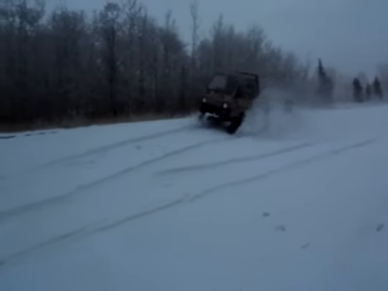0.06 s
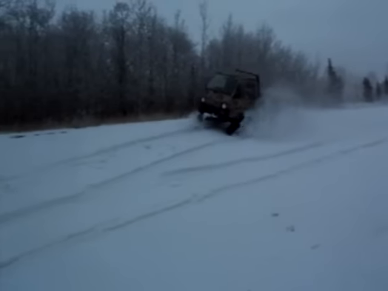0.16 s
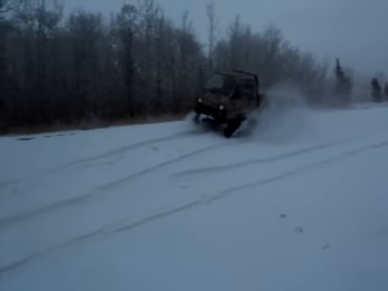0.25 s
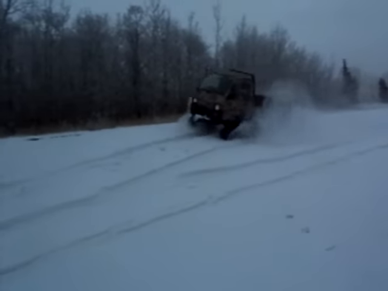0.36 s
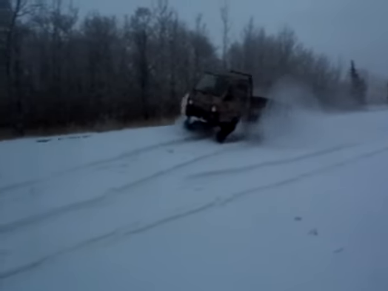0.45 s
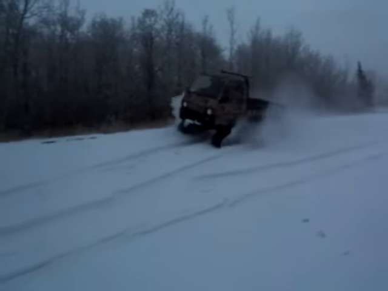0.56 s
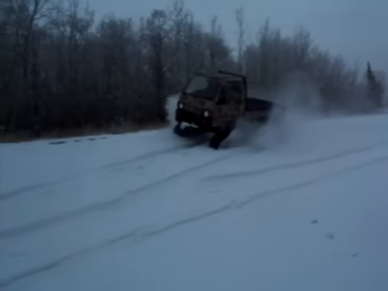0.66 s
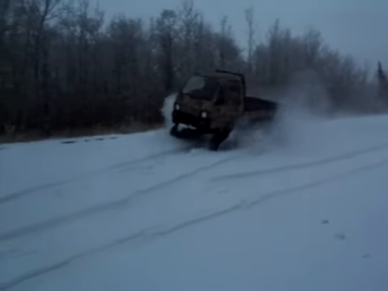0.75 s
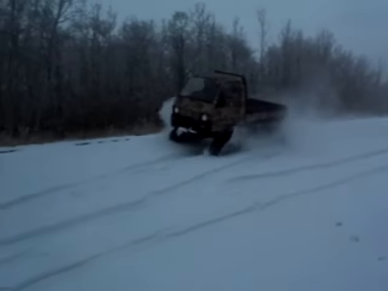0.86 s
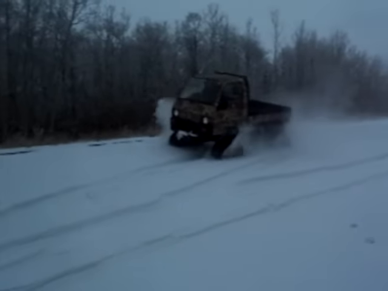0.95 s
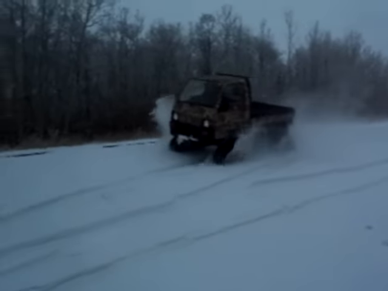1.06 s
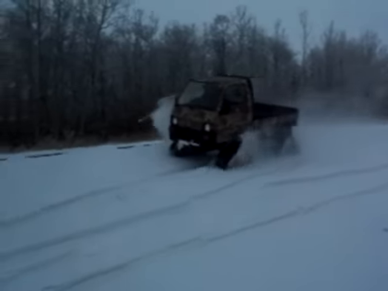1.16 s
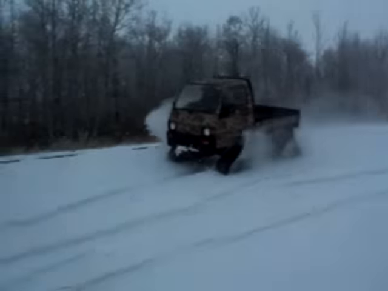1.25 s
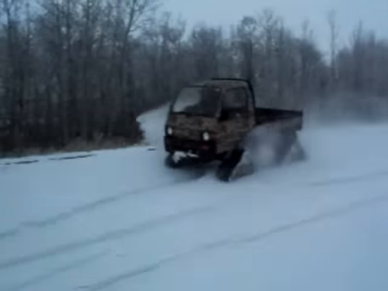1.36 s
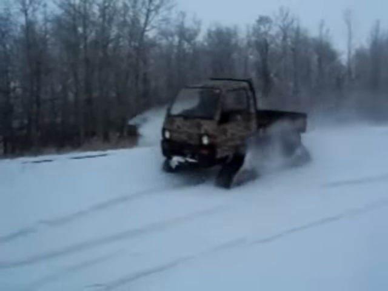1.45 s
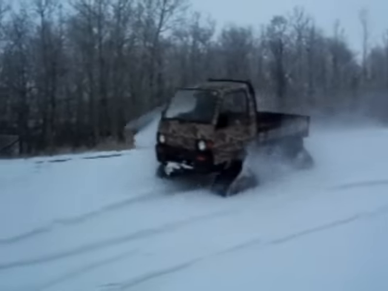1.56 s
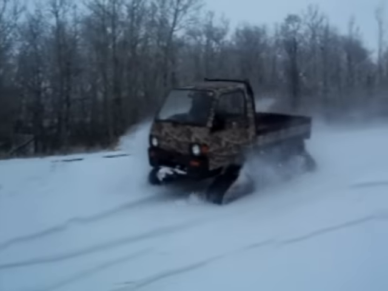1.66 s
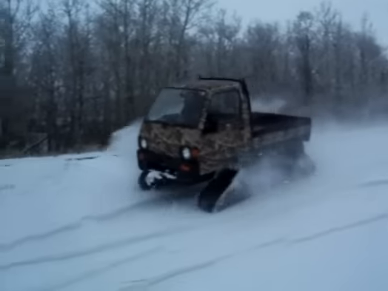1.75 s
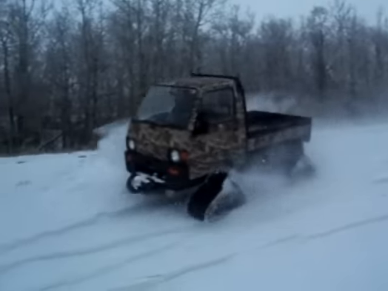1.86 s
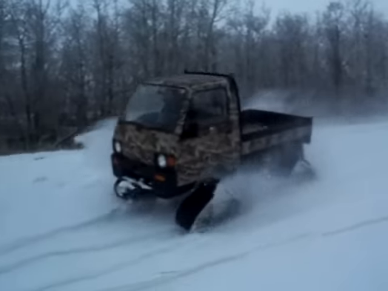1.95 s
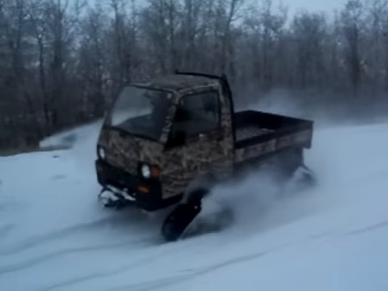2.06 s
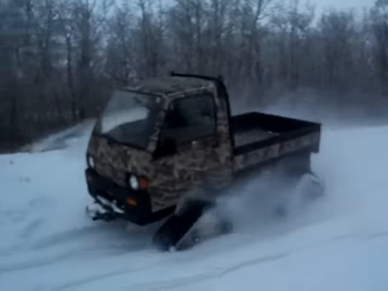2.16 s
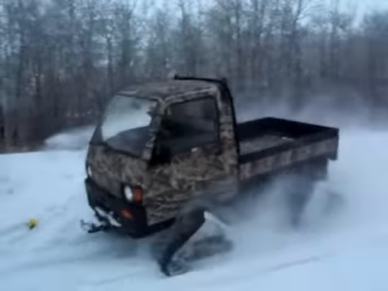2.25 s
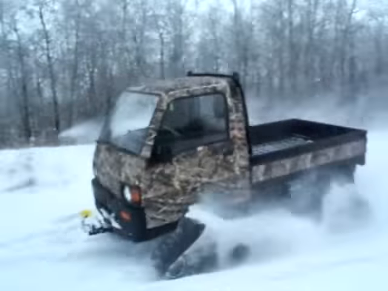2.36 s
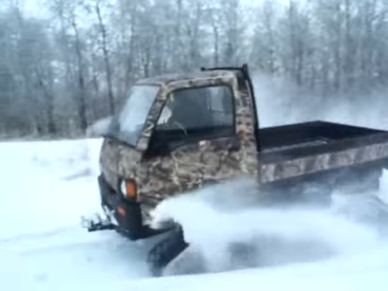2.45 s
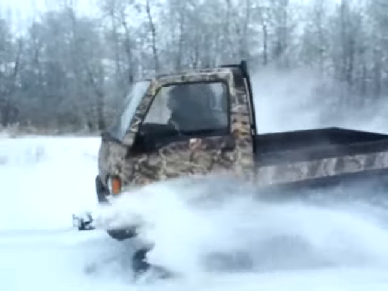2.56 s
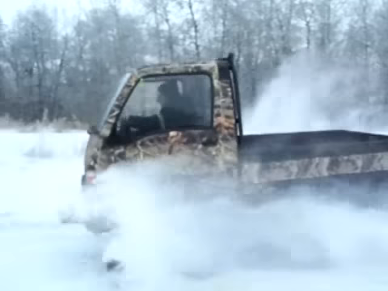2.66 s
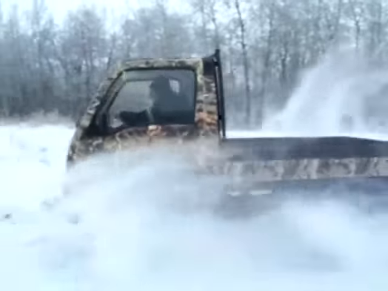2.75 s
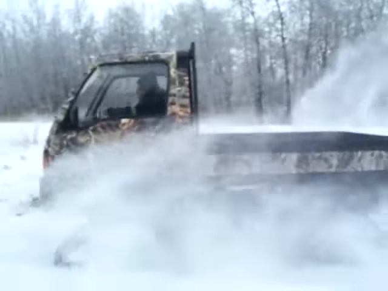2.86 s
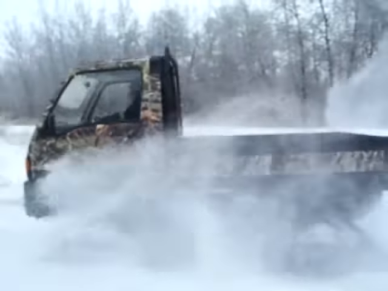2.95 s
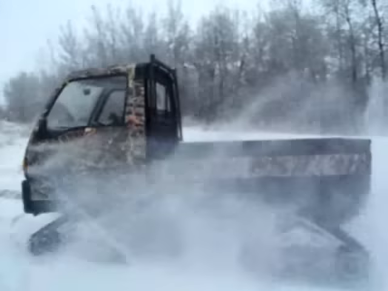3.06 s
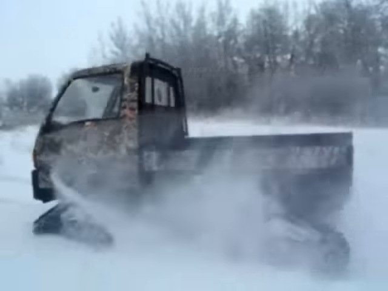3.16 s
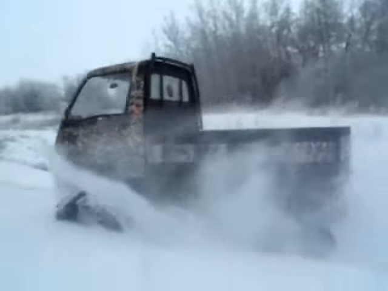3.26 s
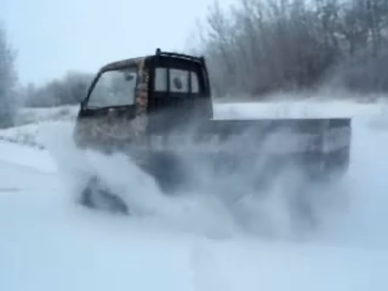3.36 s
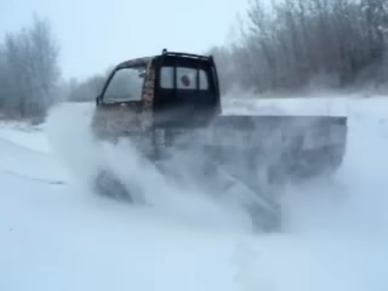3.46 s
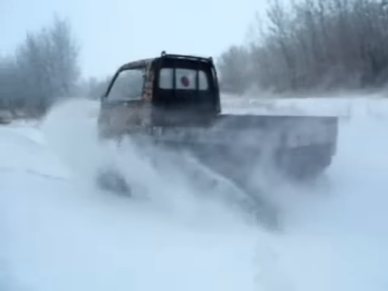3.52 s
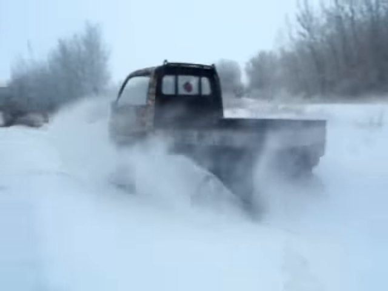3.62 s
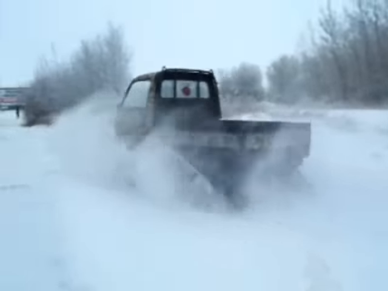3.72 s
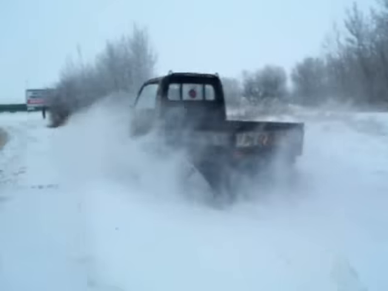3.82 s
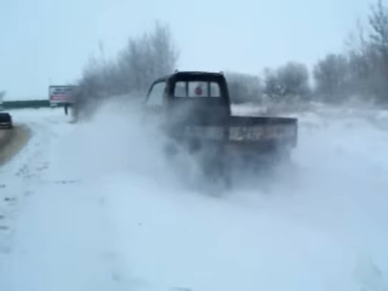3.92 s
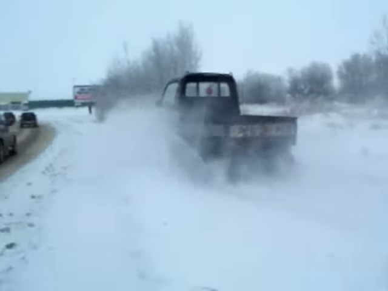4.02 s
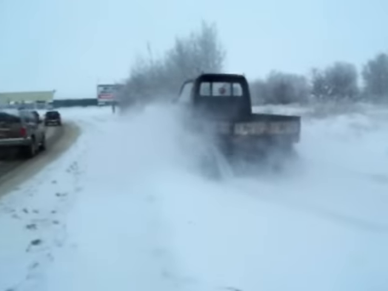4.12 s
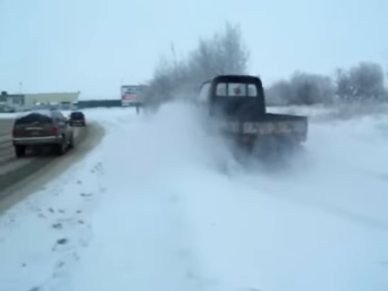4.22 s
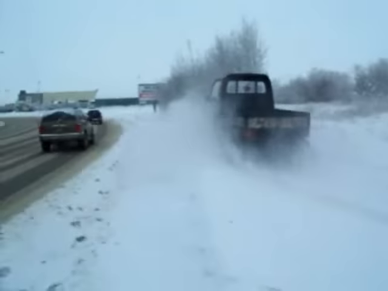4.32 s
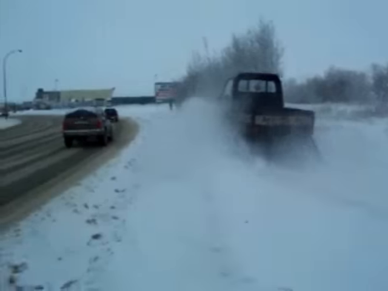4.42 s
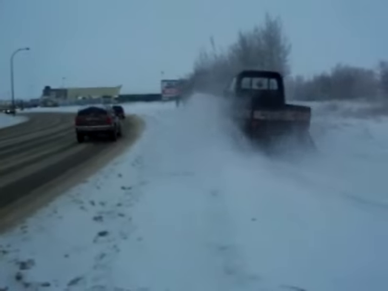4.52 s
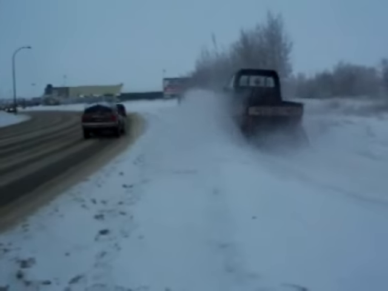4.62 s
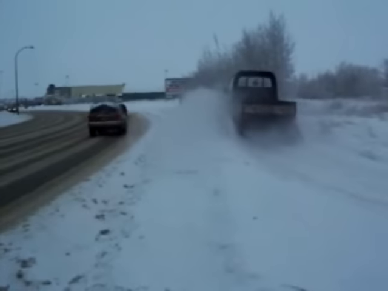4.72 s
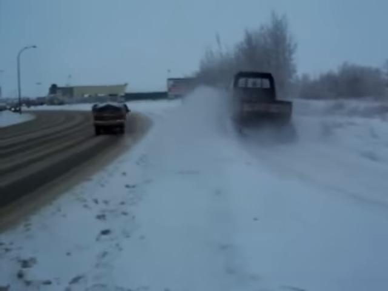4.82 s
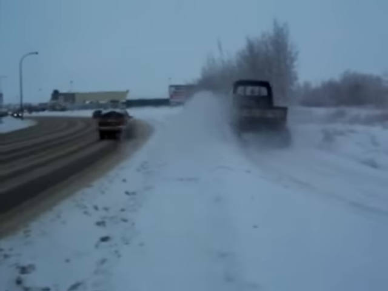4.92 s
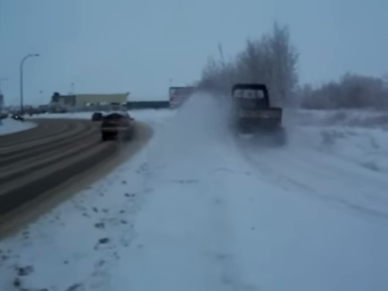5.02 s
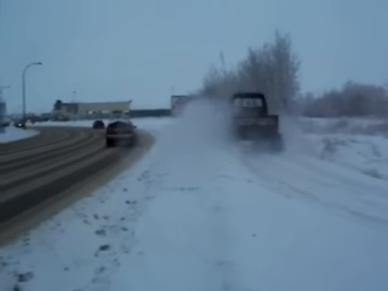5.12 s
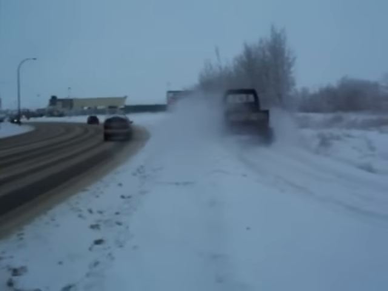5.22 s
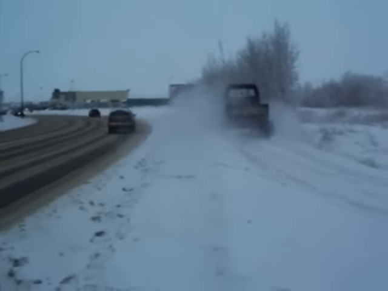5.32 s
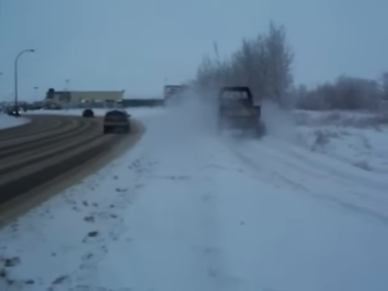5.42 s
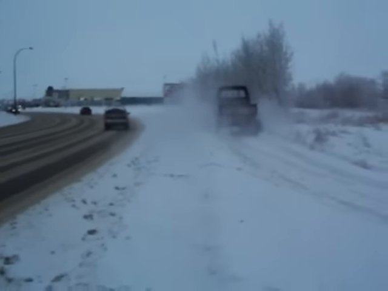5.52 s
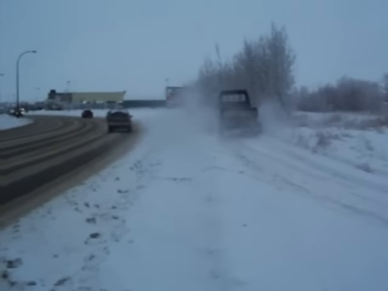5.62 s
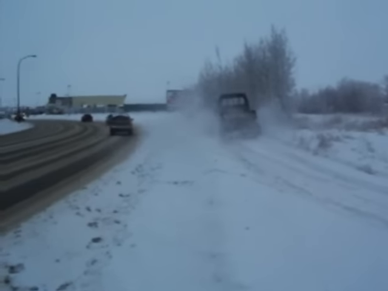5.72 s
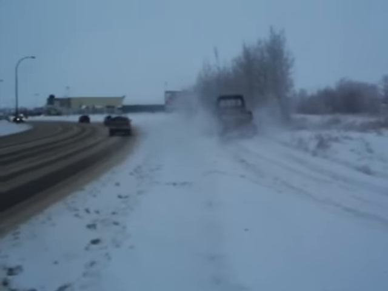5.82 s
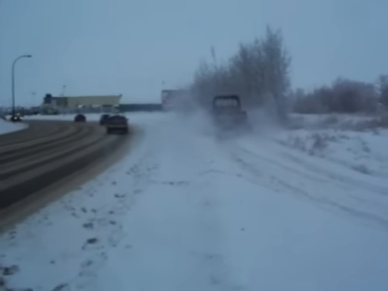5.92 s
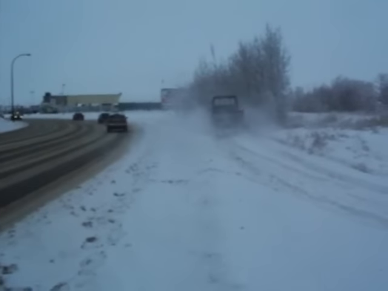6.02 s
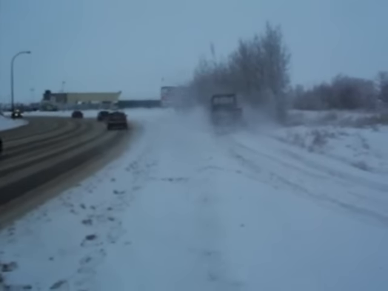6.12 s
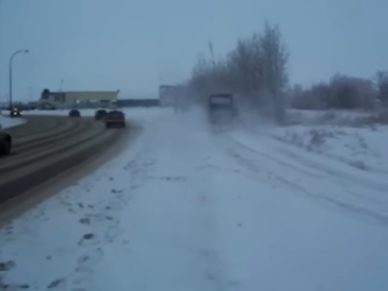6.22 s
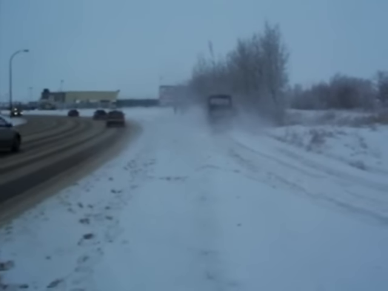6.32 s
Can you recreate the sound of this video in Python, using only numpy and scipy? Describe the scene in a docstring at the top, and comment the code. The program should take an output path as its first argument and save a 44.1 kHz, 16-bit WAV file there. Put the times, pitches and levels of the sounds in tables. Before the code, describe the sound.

A small engine buzzes hard as a tracked mini truck rushes past over deep snow, chassis knocking, snow hissing, then recedes with dry rapid ticking.

```python
"""A three-cylinder engine near 5000 rpm buzzes and clatters nearer over deep snow, the chassis knocking beneath it.
It drives a mini truck on four rubber tracks past a mono camera microphone, 2.9 m off at the closest.
Engine orders and noise bursts follow its cycles; lug passages drive the track drone, slaps and thrown snow.
A track ticks on the way out, by dry snaps with ringing modes. Low wind and the hum of the road lie underneath."""
import sys
import numpy as np
from scipy import signal
from scipy.fft import rfft, irfft, next_fast_len
from scipy.io import wavfile
from scipy.ndimage import uniform_filter1d

SR = 44100
rng = np.random.default_rng(int(sys.argv[2]) if len(sys.argv) > 2 else 0)


def store_wav(level_fs):
    """Save 16-bit WAV to argv[1]."""
    pcm = np.round(np.clip(np.atleast_2d(level_fs), -1, 1) * 32767)
    wavfile.write(sys.argv[1], SR, pcm.T.astype(np.int16))


N = 281358
T = np.arange(N) / SR

# lugs passing a sprocket: t/s, rate/Hz
LUG_RATE = [(0, 33), (.55, 31.8), (.9, 32.8), (1.2, 34), (1.48, 34.3), (1.8, 36), (2.1, 37.3), (2.35, 35.8),
            (2.62, 37.2), (2.88, 36.2), (3.1, 37.3), (3.35, 37.3), (3.6, 38.4), (4, 37.4), (4.3, 35.8),
            (4.5, 35.9), (5.2, 34.3), (5.7, 35), (6.4, 36.2)]
# engine colour heard from the front: f/Hz, relative level/dB
FRONT_COLOUR = [(150, -22.5), (270, -8), (390, 2), (450, 2), (510, 4.5), (580, -1), (645, 4.5), (780, -2.5),
                (1180, -3.5), (1290, 0), (1380, -5), (1750, -10), (2100, -33), (3500, -24)]
# engine colour heard from behind: f/Hz, relative level/dB
REAR_COLOUR = [(150, -1.5), (270, -1.5), (370, 1), (430, -1.5), (510, 1.5), (570, 2.5), (700, 4.5),
               (820, 3.5), (1100, 2), (1250, 2), (1500, 1), (1800, -2), (2100, -10), (2800, -13),
               (3600, -30.5)]
# colour of loose fittings that rattle after a blow: f/Hz, relative level/dB
FITTINGS_COLOUR = [(380, 4.5), (600, 4), (1200, 12.5), (1700, -18), (2100, -28)]


def undb(db):
    """Decibels to gain."""
    return 10 ** (np.asarray(db) / 20)


def unit(x):
    """Scale to rms 1."""
    return x / np.sqrt(np.mean(x ** 2))


def steady(x):
    """Hold the slow level at rms 1 and keep the fast flutter."""
    return x / np.sqrt(uniform_filter1d(x ** 2, SR // 7))


def curves(table):
    """Each column of a table, joined by straight lines in time."""
    s, *columns = np.transpose(table)
    return [np.interp(T, s, column) for column in columns]


def walk(rate):
    """Smooth chance that changes about rate times a second, at most 150; spread near 1."""
    knots = rng.standard_normal(1024)
    steps = T * min(rate, 150)
    k = steps.astype(int)
    part = steps - k
    ease = part * part * (3 - 2 * part)
    return knots[k] + (knots[k + 1] - knots[k]) * ease


def swell(at, lasting):
    """Bell-shaped rise of a part that faces the microphone for a while as the truck goes by."""
    return np.exp(-.5 * ((T - at) / lasting) ** 2)


def swells_db(table):
    """Sum of smooth rises and dips, in dB."""
    return sum(db * swell(at, lasting) for at, lasting, db in table)


def swells_gain(table):
    """Sum of swells as a gain, each peaking at its level in dB."""
    return sum(undb(db) * swell(at, lasting) for at, lasting, db in table)


def gain_at(hz, points):
    """Gain of a (Hz, dB) colour, falling steeply beyond its ends."""
    f, db = np.transpose(points)
    hz = np.maximum(hz, 1)
    ends = np.minimum(1, np.minimum(hz / f[0], f[-1] / hz)) ** 2
    return undb(np.interp(np.log(hz), np.log(f), db)) * ends


def colour(x, points):
    """Filter by a (Hz, dB) colour."""
    size = next_fast_len(len(x) + SR // 10)
    hz = np.arange(size // 2 + 1) * SR / size
    return irfft(rfft(x, size) * gain_at(hz, points), size)[:len(x)]


def tones(table, turns, flutter_db, shake):
    """Fluttering tones locked to a shaft, each heard for a part of the passage."""
    out = 0
    for k, at, lasting, db in table:
        tone = np.sin(2 * np.pi * k * turns + shake * walk(45)) * undb(flutter_db * walk(40))
        out = out + steady(tone) * undb(db) * swell(at, lasting)
    return out


def place(sound, at):
    """Set a short sound at its moment."""
    return np.pad(sound, (max(int(at * SR), 0), N))[:N]


def level_short(burst):
    """Give a short sound the energy of 4 ms at rms 1."""
    return burst * np.sqrt(.004 * SR / np.sum(burst ** 2))


def crack(decay, points):
    """A dry, coloured burst of noise that dies away with the given decay in seconds."""
    age = T[:SR // 20]
    return level_short(colour(rng.standard_normal(len(age)) * np.exp(-age / decay), points))


def ringing(modes, detune=1):
    """Modes (Hz, dB, decay s) dying away after a blow."""
    age = T[:SR // 20]
    return sum(undb(db) * np.exp(-age / decay) * np.sin(2 * np.pi * hz * detune * age)
               for hz, db, decay in modes)


def thud(bright_db, detune=1):
    """The chassis rings after one blow; bright_db tilts its modes per octave about 800 Hz."""
    # chassis modes: f/Hz, level before the tilt/dB, decay/s
    chassis = [(519.5, -14, 0.025), (624, -9.5, 0.013), (870, -10.5, 0.0029), (1100, -16, 0.0043),
               (1290, -24.5, 0.004)]
    age = T[:SR // 10]
    return sum(undb(db + bright_db * np.log2(hz / 800)) * np.exp(-age / decay)
               * np.sin(2 * np.pi * hz * detune * age) for hz, db, decay in chassis)


def rumble():
    """Traffic rumbles on the road; deeper gusts of wind brush the microphone."""
    # colour of wind and road: f/Hz, relative level/dB
    low_colour = [(14, -12), (24, 0), (45, 0.5), (65, 6), (110, -14), (200, -28.5)]
    # gusts on the microphone: t/s, lasting/s, level/dB
    gusts = [(.13, 0.14, -43), (.57, 0.095, -42.5), (3.35, 0.072, -49), (2.66, 0.11, -45),
             (3.02, 0.26, -46), (4.6, 0.079, -52), (5.0, 0.079, -45), (5.5, .25, -54)]
    road_db, gust_top_hz = -50, 60
    road, wind = (colour(rng.standard_normal(N), low_colour) for _ in range(2))
    wind = signal.sosfilt(signal.butter(4, gust_top_hz, fs=SR, output="sos"), wind)
    return steady(road) * undb(road_db) + steady(wind) * swells_gain(gusts)


def traffic(flutter_db=2, shake=.25):
    """Car engines on the road are one fluttering, wavering sine whose pitch climbs overall."""
    # distant road hum: t/s, f/Hz, level/dB
    road_hum = [(0, 102.4, -46), (.4, 100.9, -51), (.75, 103, -45.5), (1.3, 106, -44.5), (1.7, 108, -47),
                (2.2, 109, -59), (2.55, 110.1, -43.5), (3.2, 109.8, -62), (3.7, 110.2, -52),
                (4.12, 110.3, -40.5), (4.37, 108.5, -59), (4.52, 106.5, -48.5), (5.05, 112.8, -51),
                (5.5, 116.5, -43), (5.68, 116.3, -67), (6.38, 117.5, -60)]
    hz, level_db = curves(road_hum)
    hum = np.sin(2 * np.pi * np.cumsum(hz) / SR + shake * walk(11)) * undb(flutter_db * walk(26))
    return steady(hum) * undb(level_db)


def distance(lead):
    """Distance of a part lead seconds ahead of the truck's middle, in units of the closest approach."""
    passes_s, speed_m_s, closest_m = 2.53, 5.6, 2.9
    return np.hypot(1, speed_m_s * (T + lead - passes_s) / closest_m)


def snow(lugs, load_db, throb=0.033, grain_db=2, gust_db=.5, spray_db=-2.0, spray_share=0.94, churn_share=0.56):
    """Dense grains of snow fly off each lug, over the dull churning under the tracks; both grow with load."""
    # thrown snow: t/s, level before spray_db and load/dB
    spray_level = [(0.0, -44.5), (0.25, -47), (0.57, -47), (0.89, -42), (1.31, -45.5), (1.53, -47.5),
                   (2.22, -43.5), (2.42, -43.5), (3.14, -45.5), (3.82, -40.5), (4.6, -47), (5.35, -49.5),
                   (5.63, -45.5), (6.0, -48.5), (6.38, -48.5)]
    # colour of the thrown snow: f/Hz, relative level/dB
    spray_colour = [(1200, -6.5), (2000, -0.5), (2450, 2), (3050, -2), (3900, 1), (4600, -1.5), (5200, -5),
                    (6200, -18), (6800, -12.5), (7400, -10.5), (8000, -19.5), (8700, -21), (9400, -72.5)]
    # colour of the churned snow: f/Hz, relative level/dB
    churn_colour = [(70, 2.5), (120, 2.5), (175, -0.5), (240, -3), (320, -9.5), (450, -19.5)]
    # churn: level at the closest before load, fall per tenfold distance, lead on the truck's middle
    closest_db, fall_db, lead_s = -38.5, 8.5, 0.43

    grain_sizes = undb(grain_db * np.minimum(rng.exponential(size=N), 6))
    grains = rng.standard_normal(N) * (rng.random(N) < .3) * grain_sizes
    grains = grains * (1 + throb * np.cos(2 * np.pi * lugs)) * undb(gust_db * walk(45))
    spray_gain = undb(curves(spray_level)[0] + spray_db + spray_share * load_db)
    spray = unit(colour(grains, spray_colour)) * spray_gain

    churn = steady(colour(rng.standard_normal(N), churn_colour))
    churn_db = closest_db - fall_db * np.log10(distance(lead_s)) + churn_share * load_db
    return spray + churn * undb(churn_db)


def tracks(lugs, load_db, slip=0.022, others_db=-12, load_share=0.4):
    """Lugs beat on the sprockets, harder under load; the near track leads, three others slip and beat with it."""
    # drone: multiple of the lug rate, level far off/dB, flutter/dB, swells [t/s, lasting/s, level/dB]
    # (levels before load)
    drone = [(2, -56.5, 2.4, [(.27, 0.29, -42.5), (1.05, 0.26, -43), (1.74, 0.065, -35.5),
             (2.04, 0.11, -34), (1.42, 0.1, -43), (2.38, 0.12, -38.5), (2.63, 0.042, -33),
             (2.94, 0.073, -32), (3.4, .18, -40.5), (5.28, .04, -39)]), (3, -62.5, 3, [(.05, 0.1, -37.5),
             (6.1, 0.18, -43.5)]), (4, -50.5, 3.9, [(.98, 0.29, -42.5), (1.46, 0.071, -35.5),
             (1.8, 0.29, -41.5), (2.25, 0.17, -37.5), (2.8, 0.088, -35), (3.08, 0.064, -34.5),
             (3.3, 0.12, -32), (3.68, 0.085, -38), (3.97, 0.24, -37.5), (4.36, 0.055, -42),
             (5.3, 0.2, -50)])]
    # higher tones: multiple of the lug rate, loudest t/s (may lie past the end), lasting/s, level/dB
    overtones = [(6, 2.741, 0.18, -42), (6, 3.3, 0.37, -46.5), (10, 3.6, 0.037, -40),
                 (10.2, 4.17, 0.051, -41.5), (10.35, 4.53, 0.23, -46.5), (5.15, 4.064, .15, -50),
                 (5, 4.672, 0.26, -54.5), (5.4, 7, 0.35, -51)]
    out = 0
    # slips in lugs: a small wander of its own for every track, plus a wider one for each of the three others
    slips = [slip * walk(4.6) + spread * walk(1.4) for spread in (0, .3, .4, .5)]
    sizes = [1] + [undb(others_db)] * 3
    for k, far_db, flutter_db, rises in drone:
        tone = sum(size * np.sin(2 * np.pi * (round(k) * (lugs + lag) + rng.random()))
                   for size, lag in zip(sizes, slips))
        power = undb(far_db) ** 2 + sum((undb(db) * swell(at, lasting)) ** 2 for at, lasting, db in rises)
        fluttering = steady(tone * undb(flutter_db * walk(32)))
        out = out + fluttering * np.sqrt(power) * undb(load_share * load_db)
    return out + tones(overtones, lugs, flutter_db=1.5, shake=0.39)


def slaps(lugs, load_db, scatter_db=2, bright_db=1, detune=0.047, rattle_db=-9, rattle_decay=0.0056):
    """Lugs slap the idler wheels and shake the chassis, each a little differently: a lumpy growl."""
    # slapping heard: loudest t/s, lasting/s, level before load/dB
    slap_swells = [(1.05, 0.28, -41), (1.9, .15, -40.5), (2.6, 0.37, -42.5)]
    out = np.zeros(N + SR)
    for i in np.flatnonzero(np.diff(np.floor(lugs))):
        size = undb(scatter_db * rng.standard_normal())
        body = thud(bright_db, 1 + detune * rng.standard_normal())
        rattle = undb(rattle_db) * crack(rattle_decay, FITTINGS_COLOUR)
        for part in body, rattle:
            out[i:i + len(part)] += size * part
    return unit(out[:N]) * swells_gain(slap_swells) * undb(load_db)


def snap(far, grit, grit_decay):
    """One hard contact and a brief spill of grit, coloured from near (0) to far (1)."""
    # colour of a tick close by: f/Hz, relative level/dB
    near_colour = [(900, -4), (1600, 16.5), (2400, 7.5), (3400, 9.5), (4600, 10), (6200, -7.5),
                   (7300, -3.5), (9000, -14)]
    # colour of a tick far off: f/Hz, relative level/dB
    far_colour = [(900, 8), (1600, 12.5), (2900, 7.5), (4600, 5.5), (6200, -9), (7300, -12), (9000, -18)]
    age, hz = T[:SR // 20], np.arange(513) * SR / 1024
    push = grit * rng.standard_normal(len(age)) * np.exp(-age / grit_decay)
    push[0] += 1
    gain = gain_at(hz, near_colour) ** (1 - far) * gain_at(hz, far_colour) ** far
    # fold the cepstrum to minimum phase, so that the contact starts at once
    cepstrum = irfft(np.log(gain + 1e-3))
    cepstrum[1:512] *= 2
    cepstrum[513:] = 0
    impulse = irfft(np.exp(rfft(cepstrum)))
    return level_short(signal.fftconvolve(push, impulse)[:len(age)])


def tick(at, db, grit=.22, near_decay=0.0012, far_decay=.0016, thud_db=2, detune=0.044):
    """A dry tick, its rebound, a clack and a faint thud; duller and more ringing as the truck draws away."""
    # clack of the idler wheel: f/Hz, level before db/dB, decay/s
    idler = [(1140, 3.5, .004), (1530, 6, 0.0028)]
    # small steel part ringing with the far ticks: f/Hz, level before db and distance/dB, decay/s
    steel_part = [(2919, -6, .007), (3120, -7, 0.0056)]
    rebound_s, rebound_db = 0.0053, -11
    far = np.interp(at, (5.4, 6.17), [0, 1])  # turns from near to far between these seconds
    decay = near_decay + far * (far_decay - near_decay)
    blow, bounce = (snap(far, grit, decay) for _ in range(2))
    rebound = undb(rebound_db) * np.pad(bounce, (int(rebound_s * SR), 0))[:len(blow)]
    body = ringing(idler, 1 + detune * rng.standard_normal()) + far ** 2 * ringing(steel_part)
    body = body + undb(thud_db) * thud(0)[:len(blow)]
    return place(undb(db) * (blow + rebound + body), at)


def ticks(count=14):
    """A track ticks in runs mostly one lug apart, with a second track softly between its beats."""
    # sharp ticks: t/s, level before the trim/dB
    tick_times = [(4.328, -42.5), (4.3605, -46), (4.3874, -44), (4.4166, -43), (4.4436, -44), (4.4736, -44),
                  (4.5006, -47), (4.5283, -43), (4.5575, -42.5), (4.5869, -52), (4.6154, -46.5),
                  (4.6464, -45.5), (4.6759, -44), (4.7073, -49), (4.7380, -46), (4.7666, -51),
                  (4.797, -44.5), (4.825, -47), (4.8534, -41), (4.882, -45), (4.9112, -43), (4.9392, -46),
                  (4.9665, -43), (5.056, -45), (5.0797, -46.5), (5.278, -50.5), (5.4255, -43.5),
                  (5.5573, -48), (5.5665, -45), (5.5791, -48), (5.6301, -48), (5.65, -45), (5.7158, -46),
                  (5.7886, -43.5), (5.7995, -43.5), (5.8467, -42.5), (5.8704, -46.5), (5.9168, -50),
                  (5.9282, -45), (5.9549, -46.5), (5.9833, -43.5), (6.0087, -48), (6.0365, -50),
                  (6.0925, -47.5), (6.1527, -45.5), (6.1941, -44.5), (6.2219, -44.5), (6.2472, -44),
                  (6.279, -46), (6.306, -44), (6.3333, -41), (6.3593, -43)]
    trim_db, offbeat_db = 4, -12
    # loose crackle, centred past the end so that it is seldom heard
    crackle_s, crackle_lasting_s, crackle_db = 6.8, 0.12, -53
    out = sum(tick(at, crackle_db) for at in rng.normal(crackle_s, crackle_lasting_s, size=count))
    for at, db in tick_times:
        rate = np.interp(at, *np.transpose(LUG_RATE))
        out += tick(at, db + trim_db)
        out += tick(at + .5 / rate, db + trim_db + offbeat_db)
    return out


def knocks(knock_decay=0.0073, rattle_decay=0.016, rattle_db=-8):
    """Knocks ring the chassis with a thud and a crack, and loose fittings rattle after them."""
    # chassis knocks: t/s, thud level/dB, crack level/dB, tilt of the thud/dB per octave
    knock_times = [(.1635, -27, -43, 6), (0.1671, -19.5, -43, 7), (0.2145, -24, -54, -4),
                   (.2417, -19, -45, -1), (.248, -33, -36, -1), (.776, -23, -40, -4), (.833, -23, -41, -9),
                   (.893, -22, -41, -1), (.978, -28, -49, 0), (1.068, -30, -51, 8), (1.092, -22, -48, -5),
                   (1.155, -30, -51, 0), (1.546, -23.5, -51, -13), (1.832, -23, -51, -6),
                   (1.975, -19.5, -48, 8), (2.334, -40, -36.5, 6), (2.442, -34, -37.5, -4),
                   (2.895, -26, -50, -1), (2.987, -29, -48, -2), (3.225, -27, -43, 9), (5.566, -40, -40, 6),
                   (5.635, -29, -46, 6), (5.716, -35, -46, 8)]
    # colour of the crack: f/Hz, relative level/dB
    crack_colour = [(900, 7), (1600, 2), (2900, 2), (4600, 6), (6200, -18), (7300, -13), (9000, -30)]
    out = np.zeros(N)
    for at, thud_level_db, crack_db, bright_db in knock_times:
        rattle = undb(thud_level_db + rattle_db) * crack(rattle_decay, FITTINGS_COLOUR)
        sharp = undb(crack_db) * crack(knock_decay, crack_colour)
        out += place(undb(thud_level_db) * thud(bright_db), at) + place(rattle + sharp, at)
    return out


def whine(turns, rasp_hz=150):
    """The alternator whines on three shaft-locked tones; noise below rasp_hz frays the middle one to a rasp."""
    # the three tones: multiples of the cycle rate
    whine_orders = (72, 89.5, 107.9)
    # swells, a list for each tone: loudest t/s, lasting/s, level/dB
    whine_swells = [
        [(4.7, 0.25, -59), (5.35, 0.29, -59.5)],
        [(1.1, 0.3, -59), (2.5, 0.091, -53.5), (2.85, 0.16, -55), (3.55, .2, -55), (4.2, 0.14, -56.5)],
        [(.08, .1, -59), (.7, 0.092, -56), (1.05, 0.18, -57.5), (1.8, 0.33, -62.5), (4.65, 0.13, -55),
         (5.3, 0.22, -61)],
    ]
    # rasp around the middle tone: loudest t/s, lasting/s, level/dB
    rasp_swells = [(2.65, .22, -55.5), (3.55, 0.33, -55.5)]
    table = [(k, *row) for k, rows in zip(whine_orders, whine_swells) for row in rows]
    clean = tones(table, turns, flutter_db=2.0, shake=1.3)
    fray = signal.sosfilt(signal.butter(2, rasp_hz, fs=SR, output="sos"), rng.standard_normal(N))
    rasp = unit(fray * np.sin(2 * np.pi * whine_orders[1] * turns))
    return clean + rasp * swells_gain(rasp_swells)


def panels():
    """Engine vibration keeps a few body panels ringing: noise through narrow resonances."""
    # panels: f/Hz, width/Hz, swells [t/s, lasting/s, level/dB]
    panel_modes = [(520, 17, [(.88, 0.15, -37.5), (1.4, .35, -42.5), (3.4, 0.98, -48.5)]),
                   (1272, 25, [(.7, .5, -52), (2.6, 0.46, -45)]), (623, 54, [(.85, 0.11, -43),
                   (2.68, 0.085, -40), (4.15, 0.23, -44)])]
    out = 0
    for hz, width, rises in panel_modes:
        ring = signal.lfilter(*signal.iirpeak(hz, hz / width, fs=SR), rng.standard_normal(N))
        out = out + steady(ring) * swells_gain(rises)
    return out


def buzz(hz, turns, rear, flutter_db=1.5, fade_db=1.5, shake=0.39):
    """Unequal cylinders sound every multiple of the cycle rate; each fades and shakes as the truck pitches."""
    # orders that stand out: multiple of the cycle rate, loudest t/s (may lie past the end), lasting/s, lift/dB
    strong_orders = [(19, 0.099, 0.22, 11.5), (17, .2, .2, -1), (28, 0.35, .25, 4), (34, 0.53, 0.29, 12),
                     (17, 0.58, 0.25, 5), (22, 2.3, 0.44, 8), (24, 1.0, 0.55, 6), (33, 1.45, 0.65, 7),
                     (12, 1.95, 0.18, 8.5), (30, 1.96, 0.068, 5), (31, 1.6, .2, 5), (30, 2.55, 0.5, 9),
                     (16, 3.1, 0.3, 3), (21, 4, 0.18, -1), (32, 2.75, 0.27, 12.5), (33, 2.8, .18, 12.5),
                     (34, 2.82, 0.29, 10.5), (12, 3.8, 0.66, 6.5), (23, 3.43, .2, 12), (17, 2.4, 0.15, 10),
                     (30, 4.38, 0.46, 6), (29, 4.7, 0.23, 5), (15, 3.9, .15, 7), (15, 4.4, 0.086, 5),
                     (17, 4.1, 0.12, 8.5), (18, 5.62, 0.11, 5), (18, 7.2, 0.067, 9), (29, 5.05, 0.17, 5.5),
                     (12, 5.3, 0.11, 5), (17, 2.8, 0.093, -1), (35, 4.3, .3, 8), (29, 5.3, .25, 5.5),
                     (48, 5.4, .4, 4), (60, 4.7, .22, 12)]
    out = np.zeros(N)
    coarse = slice(None, None, 512)  # the body colour changes slowly
    for k in range(6, 62):
        f, back = k * hz[coarse], rear[coarse]
        body = np.sqrt((1 - back) * gain_at(f, FRONT_COLOUR) ** 2 + back * gain_at(f, REAR_COLOUR) ** 2)
        lift_db = swells_db([row[1:] for row in strong_orders if round(row[0]) == k])
        size = np.interp(T, T[coarse], body) * undb(lift_db + fade_db * walk(2.44) + flutter_db * walk(19))
        out += size * np.sin(2 * np.pi * (k * turns + rng.random()) + shake * walk(25))
    return steady(out)


def clatter(turns, rear, gate=0.14, grit_db=1.5):
    """Gas and valve noise, swelling with each of three firings a cycle, through the same body."""
    firing = np.cos(2 * np.pi * 3 * turns)
    bursts = rng.standard_normal(N) * (1 + gate * firing) * undb(grit_db * walk(140))
    front_part = np.sqrt(1 - rear) * unit(colour(bursts, FRONT_COLOUR))
    return front_part + np.sqrt(rear) * unit(colour(bursts, REAR_COLOUR))


def engine(hz, turns, load_db, roar_hz=765, body_db=-1.06, load_share=0.9):
    """Buzz and clatter turn from front to rear as the truck passes; the level surges under load."""
    # engine as heard: t/s, level before body_db and load/dB, roar below roar_hz against the rest/dB
    engine_level = [(0.0, -34, -1.5), (0.28, -37, -0.5), (0.48, -33.5, -9), (0.76, -33, 0),
                    (1.67, -35, -2.3), (1.69, -36.5, 2.5), (2.17, -34, -1.5), (2.97, -35.5, -0.5),
                    (3.05, -37, -1.5), (3.34, -36.5, -2), (3.39, -38.5, 0.5), (3.8, -33, -4),
                    (3.91, -33.5, -2), (4.87, -38, -1), (5.6, -36.5, -3.5), (6.15, -39.5, -0.5),
                    (6.36, -39.5, -5), (6.38, -41, 4)]
    # the passage: t/s, share heard from behind (0-1), clean orders over clatter/dB
    passage = [(0, 0.05, 0), (.5, 0.07, 1), (1.5, 0.08, 0.5), (2.3, 0.11, 2), (2.9, 0.85, 5),
               (3.5, 0.5, -0.5), (4.4, 0.3, 0.5), (5, 1, -1.5), (6.38, 1, -6.5)]
    # low boom of the exhaust: multiple of the cycle rate, loudest t/s, lasting/s, level/dB
    exhaust_boom = [(4, 2.45, 0.24, -45), (4, 3.03, 0.16, -43), (2, 2.6, .22, -41.5)]
    level_db, roar_db = curves(engine_level)
    rear, clean_db = curves(passage)
    rear = np.clip(rear, 0, 1)
    sound = undb(clean_db) * buzz(hz, turns, rear) + clatter(turns, rear)
    roar = signal.sosfiltfilt(signal.butter(4, roar_hz, fs=SR, output="sos"), sound)
    mix = steady(sound - roar) + undb(roar_db) * steady(roar)
    body = undb(level_db + body_db + load_share * load_db) * mix
    return body + tones(exhaust_boom, turns, flutter_db=-1.0, shake=0.34) + panels()


def scene():
    """The crankshaft drives engine and alternator, the lugs drone, slaps and spray; drifts vary the load."""
    # engine speed: t/s, four-stroke cycle rate/Hz
    cycle_rate = [(0.08, 37.77), (0.24, 37.41), (0.38, 38.04), (0.73, 37.93), (0.83, 37.71), (1.02, 38.87),
                  (1.24, 38.45), (1.4, 39.1), (1.59, 39.26), (1.99, 41.22), (2.18, 41.37), (2.61, 43.58),
                  (2.75, 42.49), (2.9, 43.55), (3.11, 42.23), (3.3, 43.6), (3.49, 43.23), (4.51, 41.15),
                  (4.6, 40.76), (4.81, 40.5), (5.02, 39.74), (5.8, 40.6)]
    # riding over drifts, bearing down (+) or going light (-): t/s, lasting/s, load/dB
    drifts = [(.35, 0.066, -1), (.9, 0.14, 0), (1.5, 0.13, 1.5), (1.61, 0.048, -2), (1.95, 0.053, 2),
              (2.1, 0.064, -3), (2.51, 0.047, -2), (2.66, 0.082, 1), (2.93, 0.036, 1.5),
              (3.09, 0.031, -0.5), (3.3, 0.086, 2.5), (3.47, 0.11, -0.5), (3.9, 0.23, -0.5),
              (4.33, 0.026, -1.5), (4.48, 0.062, 1), (4.63, 0.056, -2), (5.61, 0.078, 1)]
    hz, = curves(cycle_rate)
    turns = np.cumsum(hz * (1 + 0.00202 * walk(25))) / SR  # engine cycles so far, slightly uneven
    lugs = np.cumsum(curves(LUG_RATE)[0]) / SR  # lugs passed so far
    load_db = swells_db(drifts)
    background = rumble() + traffic()
    running_gear = snow(lugs, load_db) + tracks(lugs, load_db) + slaps(lugs, load_db) + ticks() + knocks()
    return (background + running_gear + whine(turns) + engine(hz, turns, load_db))[None]


def record(dry):
    """The camera cuts the top with a steep low-pass."""
    top_hz = 9050
    return signal.sosfilt(signal.ellip(10, .2, 70, top_hz, fs=SR, output="sos"), dry)


dry = scene()
out = record(dry)
store_wav(out)
```